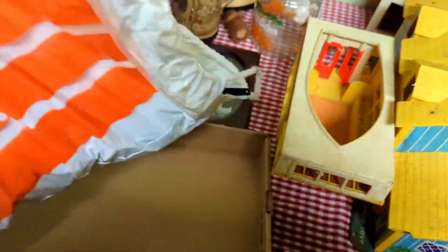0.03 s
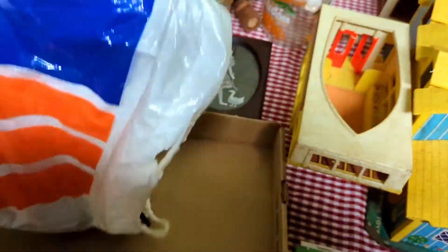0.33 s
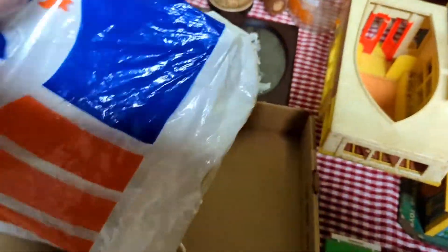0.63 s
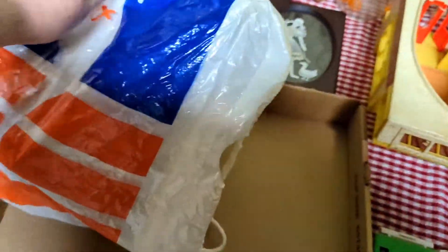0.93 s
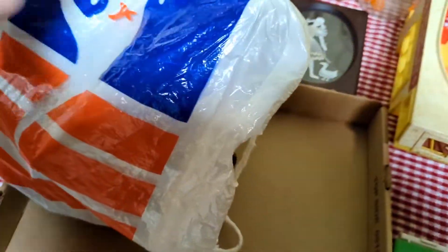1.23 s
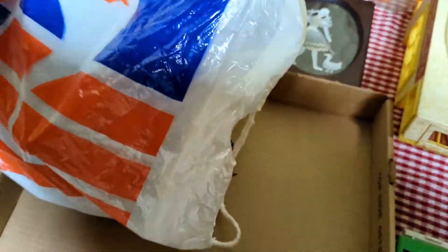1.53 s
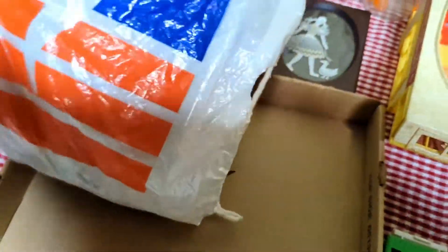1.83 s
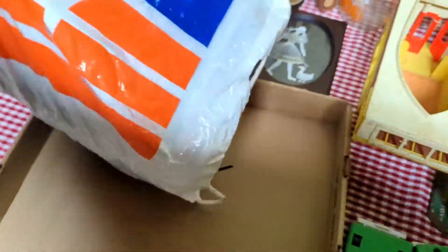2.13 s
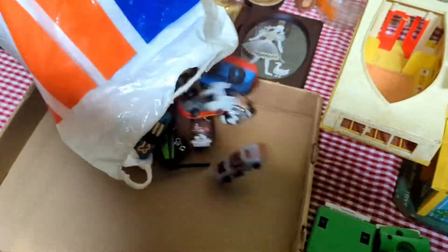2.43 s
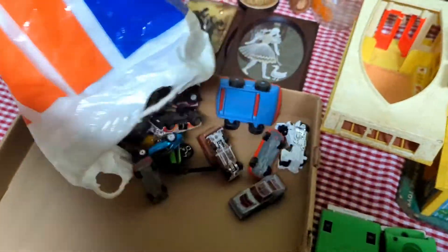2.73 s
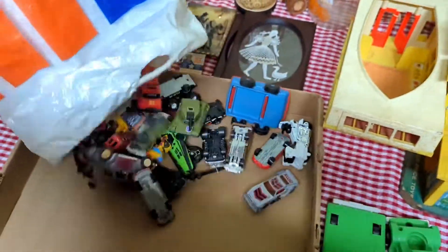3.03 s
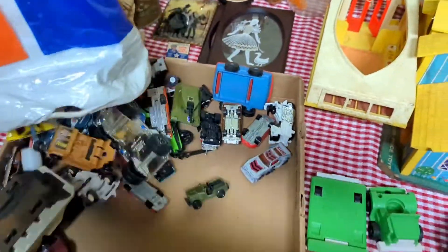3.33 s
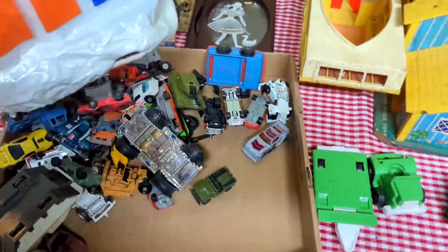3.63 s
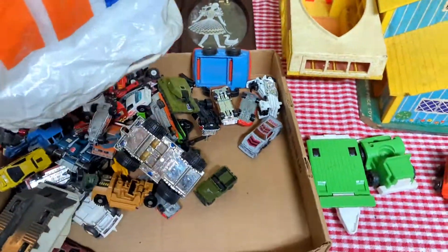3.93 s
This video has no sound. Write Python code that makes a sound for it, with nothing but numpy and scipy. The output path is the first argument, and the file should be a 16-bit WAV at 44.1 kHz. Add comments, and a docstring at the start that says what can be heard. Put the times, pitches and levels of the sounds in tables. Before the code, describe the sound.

Toy cars pour from a plastic bag into a cardboard box, close by in a small room. The loaded bag crinkles and bumps the cardboard from 0.4 to 1 second, rests briefly, then crackles again from 1.5 seconds as the cars shift inside. From 2.3 seconds they spill out with dense clacks, metallic clinks and hollow thuds. The pile settles after 3.7 seconds with a few last clicks.

```python
"""Toy cars tipped from a plastic bag into a cardboard box, close by in a small room.
First the loaded bag bumps down on the box: creases snap, car shells clack, the cardboard booms.
Near 1.2 s it rests; from 1.5 s it is lifted, crinkling again.
From 2.3 s the cars slide out along the film and pile up: metal parts clink, the walls knock,
the bottom booms. The pile settles after 3.7 s."""
import sys
import numpy as np
from scipy import signal
from scipy.fft import rfft, irfft
from scipy.io import wavfile
from scipy.ndimage import uniform_filter1d

SR = 44100
rng = np.random.default_rng(int(sys.argv[2]) if len(sys.argv) > 2 else 0)


def bounce(signal):
    """Save signal as a 16-bit WAV file at the path given by the first command-line argument."""
    frames = np.transpose(np.atleast_2d(signal))
    limited = np.clip(frames, -1, 1)
    pcm = np.round(limited * 32767).astype(np.int16)
    wavfile.write(sys.argv[1], SR, pcm)


N = 176400

# room air spectrum: freq_hz, level_db
AIR_SPECTRUM = [(60, -26), (110, -8), (300, -4.5), (900, -13), (2200, -11.5), (5000, -27), (15000, -35)]

# bag crinkling, small parts ticking: time_s, level_db
CRINKLE_CURVE = [(0, -32), (.045, -27), (.095, -34), (.12, -54), (.21, -38), (.36, -37.5), (.40, -29.5),
                 (.45, -39), (.51, -30), (.54, -23.5), (.70, -25.5), (.93, -26), (.97, -39), (1.10, -38),
                 (1.19, -49), (1.30, -49), (1.35, -42), (1.47, -46), (1.48, -31), (1.52, -30), (1.55, -37),
                 (1.62, -30.5), (1.65, -28), (1.70, -31), (1.78, -20.5), (1.86, -29.5), (1.92, -30),
                 (1.97, -25), (2.03, -26), (2.09, -29), (2.14, -21), (2.40, -23), (2.56, -19.5),
                 (2.60, -26), (2.73, -21), (2.80, -27.5), (2.885, -23.5), (2.92, -20), (2.99, -20),
                 (3.03, -25.5), (3.10, -18.5), (3.38, -19), (3.62, -18), (3.74, -23.5), (3.78, -42),
                 (3.825, -36), (3.85, -23), (3.91, -35), (4, -38)]
# crease spectrum: freq_hz, level_db
CREASE_SPECTRUM = [(500, -55), (2000, -6.5), (3500, 0), (5500, -3), (7500, 0.5), (10000, 2), (12000, 1.5),
                   (13500, -2), (15500, -1)]
# cars sliding on the film: time_s, level_db
SLIDE_CURVE = [(0, -31.5), (.3, -49), (.55, -41), (.95, -34.5), (1.2, -71), (1.45, -47), (1.7, -43),
               (1.9, -35), (1.99, -32), (2.1, -30), (2.35, -24.5), (2.65, -31.5), (2.85, -32), (3.3, -25),
               (3.7, -31), (4, -36.5)]
# sliding spectrum: freq_hz, level_db
SLIDE_SPECTRUM = [(900, -41), (1800, -17.5), (2300, 1.5), (2900, -4), (4000, -8), (5500, -10),
                  (10000, -11.5)]
# single crease snaps: start_s, level_db, t60_s
CREASE_SNAPS = [(0.132, -35, .02), (0.15, -29, 0.017), (0.223, -24, 0.023), (0.287, -34, 0.022),
                (.387, -31, .02), (0.453, -22.5, 0.022), (0.474, -21, .014), (.488, -20.5, .016),
                (0.535, -20, .012), (0.62, -20.5, .018), (0.822, -17.5, .011), (0.878, -18, 0.033),
                (0.941, -18.5, 0.012), (1.061, -34, 0.018), (1.201, -42, .02), (1.236, -45, .016),
                (1.332, -28, 0.0047), (1.416, -36.5, .018), (1.477, -42, 0.024), (1.567, -34, .02),
                (1.628, -25.5, 0.034), (1.653, -26, .026), (1.954, -21, 0.028), (2.003, -18, 0.012),
                (2.051, -20, 0.013), (2.104, -20, 0.018), (2.174, -15.5, 0.025), (2.236, -19, .014),
                (2.321, -14, 0.014), (2.367, -15, .022), (2.381, -13, 0.03), (2.397, -17, 0.012),
                (2.457, -16.5, .016), (2.516, -15, 0.014), (2.706, -15, 0.015), (2.897, -19.5, .016),
                (2.931, -18, .018), (2.97, -23, .02), (2.996, -18, .018), (3.065, -16.5, .02),
                (3.365, -17, 0.022), (3.743, -21, .024), (3.811, -30, 0.011), (3.868, -22, .026),
                (3.876, -26, 0.013)]

# cars jostling: time_s, level_db
JOSTLE_CURVE = [(0, -33), (.04, -27.5), (.10, -41), (.125, -39.5), (.375, -38.5), (.39, -33.5), (.445, -29),
                (.46, -27.5), (.56, -21.5), (.69, -25), (.80, -23), (.85, -24.5), (.93, -21.5), (.98, -31),
                (1.10, -44.5), (1.20, -54), (1.30, -52), (1.36, -40.5), (1.47, -43), (1.505, -28.5),
                (1.55, -35), (1.62, -35.5), (1.66, -26), (1.70, -33.5), (1.78, -25), (1.92, -29),
                (1.97, -20.5), (2.03, -23.5), (2.09, -32.5), (2.12, -20), (2.22, -20.5), (2.42, -26.5),
                (2.46, -16), (2.51, -20), (2.66, -17.5), (2.80, -17.5), (2.87, -22), (2.93, -19),
                (3.0, -18), (3.25, -18.5), (3.58, -16), (3.68, -26), (3.75, -27), (3.78, -39),
                (3.83, -32.5), (3.88, -27), (3.92, -39), (4, -33.5)]
# car contact spectrum: freq_hz, level_db
CAR_SPECTRUM = [(300, -13), (700, -8), (1100, -4.5), (1800, -5.5), (2400, -1), (3200, -8), (5000, -9),
                (9000, -26.5)]
# car shell partials: pitch_ratio, level_db
SHELL_PARTIALS = [(0.721, -10), (0.898, -2.5), (1.002, 0), (1.082, -4), (1.422, -15.5)]
# hard car hits, on other cars or on the box: start_s, level_db, pitch_hz
CAR_CLACKS = [(.025, -25, 1670), (.076, -24, 2020), (.216, -25.5, 2020), (0.384, -22.5, 920),
              (.486, -23.5, 783), (.526, -20, 1010), (0.569, -25, 1130), (.712, -20.5, 1000),
              (.766, -11.5, 2210), (1.707, -18, 2374), (2.102, -21, 1900), (2.124, -20.5, 2020),
              (2.148, -16.5, 2650), (2.203, -12.5, 2316), (2.295, -18, 2750), (2.439, -12.5, 1024),
              (2.575, -12.5, 1950), (2.600, -16, 2100), (2.633, -11, 1740), (2.660, -13, 2570),
              (2.727, -34, 2170), (2.754, -14.5, 1930), (2.769, -20, 1950), (2.924, -10.5, 2500),
              (3.022, -11.5, 1090), (2.946, -17, 2740), (3.176, -11.5, 1710), (3.216, -13, 1850),
              (3.256, -17, 1760), (3.546, -21, 1760), (3.568, -22, 1610), (3.612, -21, 835),
              (3.746, -23, 1640), (3.878, -24, 2820), (3.883, -25, 1930)]
# clack spectrum through the film: pitch_ratio, level_db
MUFFLED_SPECTRUM = [(.45, -21), (.85, -2), (1.05, -1.5), (1.35, -17), (4, -35)]

# cars tumbling on cardboard: time_s, wall_db, bottom_db
TUMBLE_CURVE = [(0, -40, -47), (.20, -50, -54), (.23, -45, -60), (.375, -46.5, -60), (.40, -31.5, -25),
                (.51, -33, -35), (.54, -25, -33), (.65, -24, -43), (.69, -37, -44), (.80, -27, -30),
                (.85, -32, -48), (.92, -27.5, -40), (.98, -41, -41.5), (1.25, -51, -53), (1.47, -43.5, -53),
                (1.50, -37, -56), (1.56, -43, -45), (1.78, -34, -44), (2.0, -34, -38.5), (2.30, -33, -32),
                (2.39, -37, -45), (2.48, -26.5, -25), (2.65, -19.5, -22), (2.80, -27.5, -17),
                (2.87, -32, -38), (2.98, -26.5, -37), (3.05, -22, -25), (3.11, -28, -32), (3.30, -18, -27),
                (3.335, -25.5, -44), (3.42, -28, -42), (3.53, -23.5, -31.5), (3.72, -28.5, -46),
                (3.80, -42, -47), (3.86, -40, -39), (4, -43, -54)]
# box modes: freq_hz, level_db, t60_s
CARDBOARD_MODES = [(82, 0.5, 0.28), (90.8, 1.5, 0.12), (114.2, 8, 0.18), (202.3, -2.5, 0.061),
                   (244, -2.5, 0.14), (291, -9.5, 0.27), (363.6, -5, 0.13), (402.8, -2.5, 0.19),
                   (528.5, -6, 0.11), (648.5, -7, 0.085), (813, -10.5, 0.06), (1085, -4, 0.088)]
# cardboard contact spectrum: freq_hz, level_db
CARDBOARD_SPECTRUM = [(100, -8.5), (230, -11), (420, -6.5), (750, -15.5), (1150, -16), (1500, -13.5),
                      (2200, -14.5), (3500, -51), (9000, -47)]
# heavy landings: start_s, boom_db, knock_db, panel_hz
LANDINGS = [(0.026, -32, -38, 205), (0.385, -21.5, -33, 246), (0.417, -48, -37, 366),
            (0.523, -15.5, -22.5, 286), (0.566, -20, -42, 386), (0.611, -21.5, -23, 295),
            (.645, -28, -29, 386), (0.708, -29, -18, 256), (0.777, -31, -22.5, 253),
            (0.878, -16.5, -21, 249), (0.898, -31, -33, 313), (1.492, -50, -26.5, 366),
            (2.413, -20, -24, 254), (2.454, -17, -25, 405), (2.512, -35, -17, 391),
            (2.546, -21, -19.5, 438), (2.584, -13.5, -27, 233), (2.650, -17, -16, 254),
            (2.743, -8, -17.5, 299), (2.776, -10, -14.5, 262), (2.804, -18, -15, 261),
            (2.917, -34, -17.5, 313), (3.024, -27, -15.5, 268.6), (3.131, -32, -24, 256),
            (3.179, -19, -18, 284), (3.251, -21, -13.5, 234), (3.297, -23, -26, 271),
            (3.347, -38, -17.5, 317), (3.382, -40, -15, 273), (3.470, -32, -17.5, 359),
            (3.607, -35, -21, 261), (3.707, -42, -24.5, 293.6), (3.845, -47, -29.5, 290),
            (3.881, -35, -29.5, 282)]

# metal-on-metal hits: start_s, level_db, pitch_hz, t60_s
METAL_CLINKS = [(.846, -21, 6300, .025), (2.472, -19, 10000, .025), (2.631, -20, 10600, .025),
                (2.684, -23, 5730, .03), (2.932, -20, 5700, .03), (2.974, -17, 11750, .025),
                (3.068, -15, 3830, 0.04), (3.113, -24, 9700, .025), (3.142, -16, 11400, 0.054),
                (3.267, -16, 10500, .03), (3.326, -19, 11400, .025), (3.391, -12, 13400, .025),
                (3.430, -18, 12000, .045), (3.466, -14, 11340, 0.041), (3.508, -16, 11200, .04),
                (3.543, -12, 9000, .03), (3.580, -19, 11400, .02), (3.608, -15, 10300, .02),
                (3.648, -20, 12300, 0.037), (3.741, -17, 5380, 0.029), (3.829, -12, 11700, 0.025),
                (3.837, -8.5, 11900, 0.011), (3.877, -15.5, 3910, .012)]
# small metal part partials: pitch_ratio, level_db
METAL_PARTIALS = [(.64, -12), (0.779, -12), (0.869, -6.5), (1, 3.5), (1.079, -3), (1.17, -5), (1.27, -8)]
# metal contact spectrum: freq_hz, level_db
CLINK_SPECTRUM = [(1500, -16), (4000, -4), (7000, -5), (12000, 2), (15500, -1)]

HIT_SAMPLES = 12288
LEFT_LEAD_S, BOX_LEAD_S, LEAD_SPREAD_S = 0.000401, 0.00019, 0.00007
POUR_S, POUR_RISE_S = 2.29, 0.13  # cars leave the bag


def undb(db):
    return 10 ** (np.asarray(db) / 20)


def follow(curve, column=1):
    """Gain along a dB curve."""
    rows = np.array(curve)
    return undb(np.interp(np.arange(N) / SR, rows[:, 0], rows[:, column]))


def unit(x):
    """Scale to unit mean energy per channel."""
    return x / np.sqrt(np.mean(np.sum(x ** 2, axis=-1)))


def fade(t60_s, size):
    """Exponential decay."""
    return np.exp(-np.log(1000) * np.arange(size) / SR / t60_s)


def noise(spectrum, size, coherence, lead_s=LEFT_LEAD_S):
    """Coloured stereo noise; the shared part arrives on the left first."""
    hz = np.fft.rfftfreq(size, 1 / SR)
    knots_hz, knots_db = np.array(spectrum).T
    shared, left, right = rfft(rng.standard_normal((3, size)))
    delay_s = lead_s + LEAD_SPREAD_S * rng.standard_normal()
    shared_pair = np.array([shared, shared * np.exp(-2j * np.pi * hz * delay_s)])
    pair = np.sqrt(coherence) * shared_pair + np.sqrt(1 - coherence) * np.array([left, right])
    colour = undb(np.interp(np.log(hz + 1), np.log(knots_hz), knots_db))
    low_cut = np.minimum(hz / knots_hz[0], 1)
    return irfft(pair * colour * low_cut, size)


def crack(spectrum, t60_s, coherence=0.38, lead_s=LEFT_LEAD_S):
    """Noise burst of one contact."""
    return unit(noise(spectrum, HIT_SAMPLES, coherence, lead_s) * fade(t60_s, HIT_SAMPLES))


def ring(modes, scatter_db=3, detune=0.0099, lead_s=LEFT_LEAD_S):
    """Decaying modes, reweighted for each strike point."""
    delay_s = lead_s + LEAD_SPREAD_S * rng.standard_normal()
    t = np.maximum(np.arange(HIT_SAMPLES) / SR - np.array([[0], [delay_s]]), 0)
    out = 0
    for k, (hz, db, t60_s) in enumerate(modes):
        weight, shift = rng.standard_normal(2)
        gain = (-1) ** k * undb(db + scatter_db * weight)
        mode_hz = min(hz * (1 + detune * shift), SR / 2)
        out += gain * np.sin(2 * np.pi * mode_hz * t) * np.exp(-np.log(1000) * t / t60_s)
    return unit(out)


def shower(sound, gain, per_s, spread_db, objects):
    """Random uneven contacts among several objects; the joint level follows gain."""
    struck = rng.random(N) < per_s / SR
    strength = undb(spread_db * np.clip(rng.standard_normal(N), -2, 2))
    owner = rng.integers(0, objects, N)
    hits = struck * strength * rng.choice([-1, 1], N)
    local_rms = np.sqrt(np.abs(uniform_filter1d(hits ** 2, size=2205)) + 1e-6)
    hits = hits * gain / local_rms
    return sum(signal.oaconvolve((hits * (owner == k))[None], sound(), axes=1)[:, :N]
               for k in range(objects))


def add(out, start_s, level_db, sound):
    """Mix in a sound with its loudest 3 ms at level_db."""
    start = int(start_s * SR)
    peak_rms = np.sqrt(uniform_filter1d(np.mean(sound ** 2, axis=0), size=130).max())
    part = sound[:, :N - start]
    out[:, start:start + part.shape[1]] += part * undb(level_db) / peak_rms


def in_room(x, left_db, room_db, low_t60_s=0.14, high_t60_s=0.073, split_hz=4000):
    """Add the room tail, treble dying first, and pan."""
    size = SR // 2
    tail = 0
    for band, t60_s in ("low", low_t60_s), ("high", high_t60_s):
        sos = signal.butter(2, split_hz, band, fs=SR, output="sos")
        tail += signal.sosfilt(sos, rng.standard_normal((2, size))) * fade(t60_s, size)
    build_up = 1 - fade(0.012, size)
    reverb = signal.oaconvolve(x, unit(tail * build_up), axes=1)[:, :N]
    pan = undb(np.array([[left_db], [-left_db]]) / 2)
    return (x + undb(room_db) * reverb) * pan


def air(level_db=-46):
    """Steady, quiet room noise."""
    return unit(noise(AIR_SPECTRUM, N, coherence=0.97)) * np.sqrt(N) * undb(level_db)


def bag(snap_rise_s=0.00072):
    """Creases buckle in a dense crackle, some snap louder; cars rasp along the film."""
    out = shower(lambda: crack(CREASE_SPECTRUM, t60_s=0.025), follow(CRINKLE_CURVE) * undb(-3),
                 per_s=380, spread_db=2.5, objects=14)
    out += shower(lambda: crack(SLIDE_SPECTRUM, t60_s=0.01), follow(SLIDE_CURVE),
                  per_s=900, spread_db=5.1, objects=10)
    rise = 1 - np.exp(-np.arange(HIT_SAMPLES) / SR / snap_rise_s)
    for start_s, level_db, t60_s in CREASE_SNAPS:
        add(out, start_s, level_db + 0.5, rise * crack(CREASE_SPECTRUM, t60_s))
    return in_room(out, left_db=1, room_db=0.5)


def part_ring(partials, pitch_hz, t60_s):
    """Brief ring of a car shell or metal part."""
    return ring([(pitch_hz * ratio, db, t60_s) for ratio, db in partials], scatter_db=1.5, detune=0.02)


def jostle(centre_hz=1850, spread_oct=0.49):
    """Light contact on a car of random size: crack plus shell ring."""
    contact = crack(CAR_SPECTRUM, t60_s=0.039)
    pitch_hz = centre_hz * 2 ** (spread_oct * rng.standard_normal())
    return unit(contact + undb(1.5) * part_ring(SHELL_PARTIALS, pitch_hz, t60_s=0.057))


def clack(pitch_hz, in_bag, contact_t60_s=0.014):
    """Hard hit of a car; in the bag, the film passes only the band near the shell pitch."""
    if in_bag:
        muffled = [(pitch_hz * ratio, db) for ratio, db in MUFFLED_SPECTRUM]
        contact = undb(-4) * crack(muffled, contact_t60_s)
    else:
        contact = undb(-5.5) * crack(CAR_SPECTRUM, contact_t60_s)
    return part_ring(SHELL_PARTIALS, pitch_hz, t60_s=0.028) + contact


def cars(bounce_s=0.006):
    """Cars jostle densely; each hard clack bounces once."""
    out = shower(jostle, follow(JOSTLE_CURVE) * undb(-3.5), per_s=240, spread_db=2, objects=36)
    for start_s, level_db, pitch_hz in CAR_CLACKS:
        in_bag = start_s < POUR_S
        rebound_s = start_s + bounce_s * rng.uniform(0.8, 1.2)
        add(out, start_s, level_db - 1, clack(pitch_hz, in_bag))
        add(out, rebound_s, level_db - 6.5, clack(pitch_hz, in_bag))
    return in_room(out, left_db=-2.5, room_db=-4)


def box(bottom_below_hz=160, panel_t60_s=0.2):
    """Walls knock and the bottom booms under the load; heavy landings also ring the struck panel."""
    wall_modes = [mode for mode in CARDBOARD_MODES if mode[0] >= bottom_below_hz]
    bottom_modes = [mode for mode in CARDBOARD_MODES if mode[0] < bottom_below_hz]

    def knock():
        walls = ring(wall_modes, detune=0.016, lead_s=BOX_LEAD_S)
        contact = crack(CARDBOARD_SPECTRUM, t60_s=0.071, coherence=1, lead_s=BOX_LEAD_S)
        return unit(walls + undb(1) * contact)

    def boom():
        return ring(bottom_modes, scatter_db=1, detune=0.004, lead_s=BOX_LEAD_S)

    out = shower(knock, follow(TUMBLE_CURVE) * undb(1.5), per_s=140, spread_db=2.26, objects=10)
    out += shower(boom, follow(TUMBLE_CURVE, column=2) * undb(-3), per_s=120, spread_db=10.4, objects=4)
    for start_s, boom_db, knock_db, panel_hz in LANDINGS:
        add(out, start_s, boom_db - 2, boom())
        impact = knock()
        panel = ring([(panel_hz, 0, panel_t60_s)], lead_s=BOX_LEAD_S)
        add(out, start_s, knock_db + 0.5, impact + undb(-0.5) * panel)
    return in_room(out, left_db=0.45, room_db=-31.5)


def metal(centre_hz=10500, spread_oct=0.3):
    """Axles and metal bodies clink, densely once out of the bag."""
    def clink(pitch_hz, t60_s):
        tone = part_ring(METAL_PARTIALS, pitch_hz, t60_s)
        return unit(tone + undb(-2.5) * crack(CLINK_SPECTRUM, t60_s))

    def random_clink():
        return clink(centre_hz * 2 ** (spread_oct * rng.standard_normal()), t60_s=0.043)

    pouring = np.clip((np.arange(N) / SR - POUR_S) / POUR_RISE_S, 0, 1)
    gain = pouring * follow(CRINKLE_CURVE) * undb(-5.5)
    out = shower(random_clink, gain, per_s=110, spread_db=3.3, objects=30)
    for start_s, level_db, pitch_hz, t60_s in METAL_CLINKS:
        add(out, start_s, level_db, clink(pitch_hz, t60_s))
    return in_room(out, left_db=2, room_db=-6)


def scene():
    """Stereo sum of all sources."""
    return air() + bag() + cars() + metal() + box()


def record(dry, notch_hz=8050, notch_q=9, notch_depth=0.53, bass_hz=63, top_hz=15550):
    """Microphones: narrow treble dip, bass cut, full-scale limit, top cut."""
    notched = signal.lfilter(*signal.iirnotch(notch_hz, notch_q, SR), dry)
    x = dry + notch_depth * (notched - dry)
    x = signal.sosfilt(signal.butter(3, bass_hz, "high", fs=SR, output="sos"), x)
    return signal.sosfilt(signal.ellip(10, 0.2, 80, top_hz, fs=SR, output="sos"), np.clip(x, -1, 1))


dry = scene()
out = record(dry)
bounce(out)
```